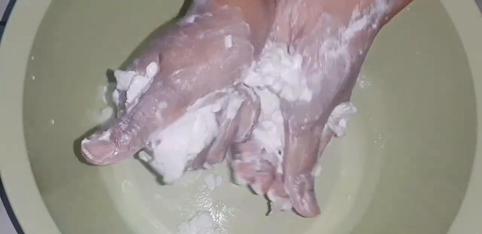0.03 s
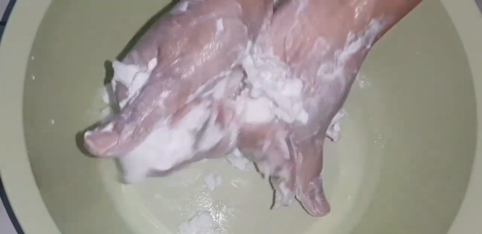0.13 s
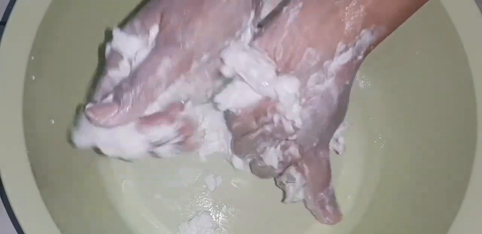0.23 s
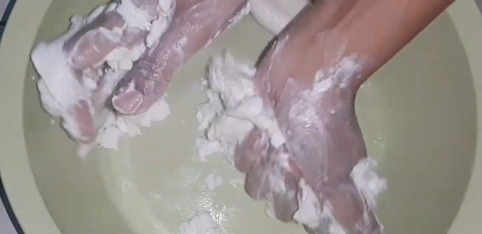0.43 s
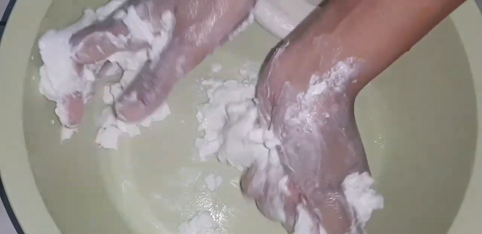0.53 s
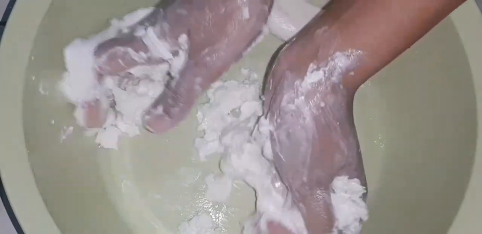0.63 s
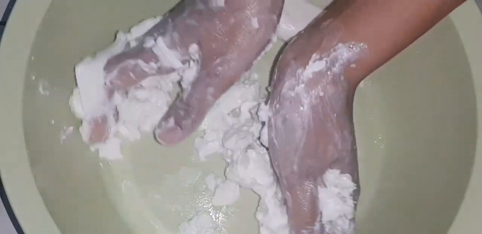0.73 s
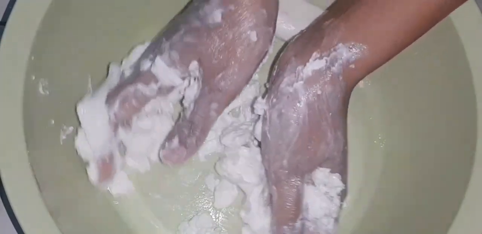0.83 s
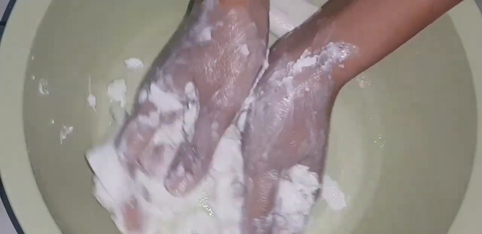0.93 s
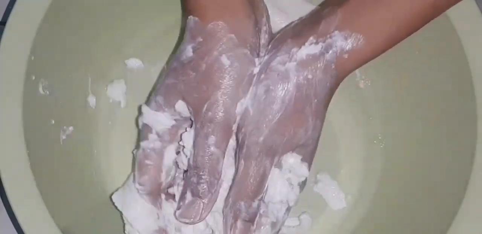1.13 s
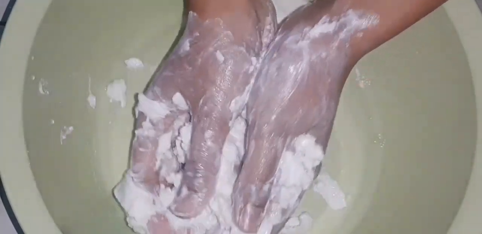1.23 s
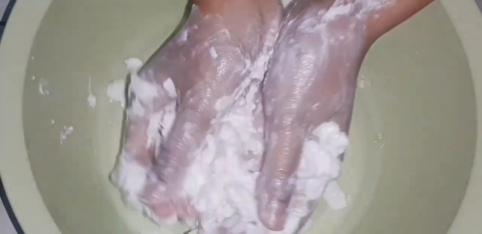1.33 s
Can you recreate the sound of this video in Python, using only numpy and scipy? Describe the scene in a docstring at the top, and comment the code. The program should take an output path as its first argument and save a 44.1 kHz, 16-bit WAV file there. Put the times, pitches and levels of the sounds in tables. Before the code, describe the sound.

Wet soap squeezed by hand, crackling and fizzing softly, with one hollow pop.

```python
"""Squeezing wet soap

Two hands squeeze crumbly wet soap in a plastic basin, close by in a small hard room.
Each squeeze presses out a fizz of tiny bubbles, wet films snap, and trapped air escapes in hollow
pops, one of them loud like a knock. The soap bumps softly against the basin.
The basin wall and the room echo it all over a low steady rumble."""
import sys
import numpy as np
from scipy import signal
from scipy.fft import rfft, irfft
from scipy.io import wavfile

SR = 44100
rng = np.random.default_rng(int(sys.argv[2]) if len(sys.argv) > 2 else 0)


def transcribe(signal):
    """Save signal, clipped to [-1, 1], as a 16-bit WAV file at the path in sys.argv[1]."""
    frames = np.atleast_2d(signal).T
    limited = np.clip(frames, -1, 1)
    pcm = np.round(limited * 32767).astype(np.int16)
    wavfile.write(sys.argv[1], SR, pcm)


N = 61739

# Wet films snapping. Each row: start in seconds, level in dB, pitch in Hz,
# fade time in ms (the code stretches it by 1.3), extra level of the bright tick in dB.
FILM_SNAPS = [(0.0209, -28, 5150, 0.7, -12), (0.0281, -41, 3200, 1.2, -3), (0.0754, -42, 3560, 0.73, -8),
              (.1045, -47, 5000, 1.14, 0.5), (0.149, -30.5, 4060, 0.85, 0.5),
              (0.1625, -35.5, 4620, 1.2, -6), (0.1677, -32.5, 4580, 0.75, -3), (0.218, -43.5, 2060, 2.2, 1),
              (0.228, -36, 5000, 1.1, -18), (0.2406, -28.5, 1900, 0.97, -1.5),
              (0.2426, -19.5, 4600, 0.9, -16), (0.2551, -39, 2260, 0.84, -12),
              (0.2595, -20, 4970, 0.73, -32), (0.2715, -29.5, 3270, 0.52, 2), (0.291, -66, 5000, 0.68, -10),
              (0.3076, -31, 5200, 0.73, -1), (0.316, -50, 4680, 1.1, -19), (0.3322, -48, 4940, .8, -9),
              (0.3384, -52, 5530, .8, 0), (0.3424, -35, 2980, 0.54, -17), (0.343, -32, 5160, 1.2, -9),
              (0.5059, -32, 4820, 0.79, -4.5), (0.536, -20, 4120, 0.66, -15.5),
              (0.5507, -33.5, 4620, 1.3, -1.5), (0.5648, -31, 2750, 1.1, -23), (.5695, -38, 2100, 1.2, -23),
              (0.5943, -26.5, 4020, 1.13, -34), (0.5958, -33, 3820, 1.7, -35), (.628, -41, 3340, 1.5, -5.5),
              (0.6435, -45, 3800, 0.83, -17), (.667, -30.5, 4000, 0.69, -0.5),
              (0.8342, -38.5, 2090, 0.97, -36), (0.9386, -46, 4140, 0.67, 3.5),
              (1.0129, -36.5, 2960, 0.73, -4), (1.0444, -28.5, 4110, 0.94, -23),
              (1.0551, -37, 2590, 1.1, -10), (1.1104, -50, 2290, 2.2, -17), (1.1184, -51, 3000, 0.95, 11),
              (1.16, -47.5, 3130, 1.8, 1), (1.1945, -45, 3870, 0.72, -10), (1.2576, -49, 2430, 1.5, -18),
              (1.2734, -46.5, 2450, 1.5, -5), (1.3114, -44.5, 4710, 2.56, 7.5)]
# Air pockets popping. Each row: start in seconds, level in dB, pitch in Hz, swell time in ms
# (the code stretches it by 1.1), extra level of the splutter in dB, left minus right in dB.
AIR_POPS = [(0.6663, -16.5, 733, 2.26, -15.5, -0.8), (1.0459, -45, 1070, 1.8, -2, 7),
            (1.1162, -43, 1090, 1.4, -5, 4), (1.142, -53.5, 1450, 1.4, -1.5, 11),
            (1.1845, -51, 1130, 1.4, 1, 4), (1.3178, -47.5, 1040, 1.29, -0.5, 8)]
# Squeezes. Each row: start, rise, hold and fade times in seconds, level in dB, pitch in Hz,
# how uneven the bubbles are in dB, extra level of their bright part in dB.
HAND_SQUEEZES = [(.008, 0.0052, 0.013, 0.028, -59, 4000, 17, -13),
                 (0.082, 0.13, 0.047, .04, -59, 4460, 1.5, -22),
                 (0.233, 0.017, .008, 0.023, -43, 4440, 2.5, 3),
                 (0.291, 0.025, 0.013, 0.028, -54.5, 4070, 10.5, -1),
                 (0.54, 0.011, 0.015, 0.0049, -50, 3700, 2, -10),
                 (0.573, 0.046, 0.018, 0.066, -59, 3780, 8, -22),
                 (0.744, 0.009, 0.039, 0.032, -55.5, 3370, -1, -4),
                 (0.963, 0.016, 0.013, .018, -48.5, 3850, 3.5, 0.5),
                 (1.005, 0.046, 0.011, 0.0087, -57, 2930, 2.6, 3),
                 (1.115, 0.043, 0.036, 0.075, -64, 2980, 5, 25)]
# Soap bumping the basin. Each row: start in seconds, level in dB, pitch in Hz,
# fade time in ms (the code shortens it to 0.84 of that).
BASIN_THUDS = [(0.2529, -44, 560, 17.5), (0.3007, -43, 287, 9.2), (.337, -49, 350, 3.1),
               (0.6672, -32.5, 342, 9), (.977, -50, 670, 21), (1.268, -44.5, 284, 8.6)]
# The tone of wet soap. Each row: frequency in Hz, boost or cut in dB.
SOAP_CURVE = [(200, -9), (600, 16), (1300, 4.5), (2300, 7), (3100, 1.5), (5200, -0.5), (6500, -7.5),
              (8200, -12.5), (10000, -21), (12500, -22), (15500, -40)]
# The tone of the room's rumble and hiss. Each row: frequency in Hz, boost or cut in dB.
RUMBLE_CURVE = [(25, -43), (55, -43), (80, -29), (115, -12.5), (170, 0.5), (230, -3.5), (310, 0),
                (420, -6.5), (550, -13.5), (800, -23.5), (1300, -28), (2500, -30), (5000, -37), (8000, -52),
                (11000, -58), (15500, -65)]
# How wide the rumble is. Each row: frequency in Hz, level of the unshared against the shared part in dB.
RUMBLE_WIDTH_CURVE = [(60, -30.5), (170, -8), (350, -11.5), (700, -2.5), (1500, -1.5), (8000, 4)]

SNAP_RISE_S, SNAP_LAG_S, SNAP_CRACK_DB, SNAP_RING_DB = 0.000046, 0.00008, -4.5, -7.5
TICK_HZ, BUBBLES_PER_S = 7460, 3000
POP_GLIDE_PER_S = 3.7  # rise in pitch, as a share of the pitch
SIDE_SPREAD = 0.89  # 0 makes left and right alike, 1 makes them unrelated
CRACKLE_DB, RUMBLE_DB = -71, -52.5
BASIN_FADE_S, ROOM_T60_S, LOW_ROOM_T60_S = 0.0032, 0.17, 0.24  # T60 is the time to fade by 60 dB
LOW_CUT_HZ, TOP_HZ = 160, 15700


def film_snaps():
    """A wet film tears with a crack and a bright tick, and the hollow behind it rings briefly."""
    out, t = np.zeros((2, N)), np.arange(N // 50) / SR
    for start, db, hz, fade_ms, tick_db in FILM_SNAPS:
        envelope = np.exp(-t / (fade_ms * 0.0013)) * (1 - np.exp(-t / SNAP_RISE_S))

        def tear():
            """The noisy crack plus a shorter, high tick."""
            crack = undb(SNAP_CRACK_DB) * burst(envelope, hz, width=0.54)
            return crack + undb(tick_db) * burst(envelope ** 2, TICK_HZ, width=0.43)

        tearing = spread(tear)
        lag = SNAP_LAG_S * rng.uniform(-1, 1) * np.array([[1], [-1]]) / 2  # one side hears the ring first
        ring = undb(SNAP_RING_DB) * envelope * np.sin(2 * np.pi * hz * (t + lag))
        add(out, start, undb(db) * (tearing + ring))
    return out


def air_pops():
    """An air pocket opens: a short spluttering tone swells, rises in pitch and dies."""
    out, t = np.zeros((2, N)), np.arange(N // 50) / SR
    for start, db, hz, swell_ms, splutter_db, pan_db in AIR_POPS:
        swell_s = swell_ms * 0.0011
        envelope = (t / swell_s * np.exp(1 - t / swell_s)) ** 2.63  # the power narrows the hump
        pitch = hz * (1 + POP_GLIDE_PER_S * (t - swell_s))
        tone = envelope * np.sin(2 * np.pi * np.cumsum(pitch) / SR)
        splutter = undb(splutter_db) * spread(lambda: burst(envelope, hz, width=1.24))
        add(out, start, pan(undb(db) * (tone + splutter), pan_db))
    return out


def lather_fizz():
    """The lather crackles faintly all the time and swells with each squeeze."""
    t = np.arange(N) / SR
    out = undb(CRACKLE_DB) * bubbles(hz=3680, uneven_db=3.5, bright_db=-4.5)
    for start, rise, hold, fade, db, hz, uneven_db, bright_db in HAND_SQUEEZES:
        rising = np.clip((t - start) / rise, 0, 1)
        fading = np.exp(-np.maximum(t - start - rise - hold, 0) / fade)
        out += undb(db) * rising * fading * bubbles(hz, uneven_db, bright_db)
    return out


def bubbles(hz, uneven_db, bright_db):
    """Many tiny bubbles burst with uneven strength, each reaching left and right differently."""
    bursting = rng.random(N) < BUBBLES_PER_S / SR
    strength = undb(uneven_db * np.minimum(rng.exponential(size=N), 4))
    clicks = bursting * strength * spread(lambda: rng.choice([-1., 1.], N))
    body = unit(resonate_twice(clicks, hz, width=1.14))
    bright = unit(resonate(clicks, hz, width=4))
    return unit(body + undb(bright_db) * bright)


def basin_thuds():
    """The soft soap bumps the basin with dull thuds that die quickly."""
    out, t = np.zeros(N), np.arange(N // 12) / SR
    for start, db, hz, fade_ms in BASIN_THUDS:
        envelope = np.exp(-t / (fade_ms * 0.00084))
        add(out, start, undb(db) * burst(envelope, hz, width=0.74))
    return out


def echoes(x, delay_s, fade_s):
    """Hard walls send back many fading echoes, different on each side."""
    t = np.arange(N // 3) / SR
    tail = rng.standard_normal((2, len(t))) * np.exp(-t / fade_s) * (t > delay_s)
    tail /= np.sqrt(np.sum(tail ** 2, axis=1, keepdims=True))
    return signal.fftconvolve(x, tail, axes=1)[:, :N]


def room_rumble():
    """Steady low room noise, much alike on both sides, with a faint wide hiss."""
    shared, side = (unit(colour(rng.standard_normal(N), RUMBLE_CURVE)) for _ in range(2))
    unshared = colour(side, RUMBLE_WIDTH_CURVE) * np.array([[1], [-1]])
    return pan(undb(RUMBLE_DB) * (shared + unshared), db=1.8)


def undb(db):
    """Turn decibels into a number to multiply by."""
    return 10 ** (np.asarray(db) / 20)


def unit(x):
    """Scale a sound to an average power of 1."""
    return x / np.sqrt(np.mean(x ** 2) + 1e-20)


def colour(x, curve):
    """Change the tone along a curve of (Hz, dB) points."""
    hz, db = np.array(curve, float).T
    frequencies = np.maximum(np.fft.rfftfreq(2 * N, 1 / SR), 1)
    gain = undb(np.interp(np.log(frequencies), np.log(hz), db))
    return irfft(rfft(x, 2 * N) * gain)[..., :N]


def resonate(x, hz, width):
    """Keep the band around one pitch; the width is a share of that pitch."""
    angle = 2 * np.pi * min(hz / SR, 0.45)
    damping = np.sin(angle) * width / 2
    return signal.lfilter([damping, 0, -damping], [1 + damping, -2 * np.cos(angle), 1 - damping], x)


def resonate_twice(x, hz, width):
    """Filter twice for a band with steeper edges."""
    return resonate(resonate(x, hz, width), hz, width)


def burst(envelope, hz, width):
    """A puff of noise around one pitch; the envelope is its loudness over time."""
    noise = rng.standard_normal(len(envelope)) * envelope
    return unit(resonate_twice(noise, hz, width)) * np.sqrt(np.mean(envelope ** 2))


def spread(make_sound):
    """Make a random sound three times: one shared, one for the left, one for the right."""
    shared = np.sqrt(1 - SIDE_SPREAD) * make_sound()
    return shared + np.sqrt(SIDE_SPREAD) * np.array([make_sound(), make_sound()])


def pan(x, db):
    """Place a sound left (+) or right (-)."""
    return x * undb(np.array([[db], [-db]]) / 2)


def add(out, start, x):
    """Mix a short sound in at its start time."""
    i = max(int(start * SR), 0)
    out[..., i:i + x.shape[-1]] += x[..., :max(N - i, 0)]


def scene():
    """Soap sounds, too small to carry deep bass, echo off the basin and the room over the rumble."""
    wet = colour(film_snaps() + lather_fizz(), SOAP_CURVE)
    low_cut = signal.butter(2, LOW_CUT_HZ, "high", fs=SR, output="sos")
    hollow = signal.sosfilt(low_cut, air_pops() + basin_thuds())
    basin = undb(-6.5) * echoes(wet, delay_s=0.00061, fade_s=BASIN_FADE_S)
    basin += undb(-17) * echoes(hollow, delay_s=0.005, fade_s=BASIN_FADE_S)
    room = undb(-9.5) * echoes(wet, delay_s=0.0041, fade_s=ROOM_T60_S / np.log(1000))
    room += undb(-10) * echoes(hollow, delay_s=0.014, fade_s=LOW_ROOM_T60_S / np.log(1000))
    return pan(wet, db=1) + hollow + basin + room + room_rumble()


def record(dry):
    """The recorder cuts off the highest treble."""
    return signal.sosfilt(signal.ellip(8, 0.2, 70, TOP_HZ, fs=SR, output="sos"), dry)


dry = scene()
out = record(dry)
transcribe(out)
```